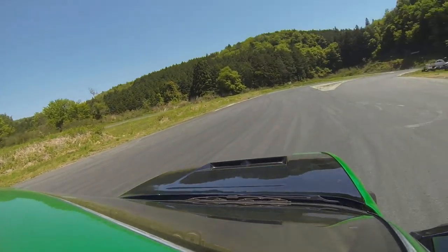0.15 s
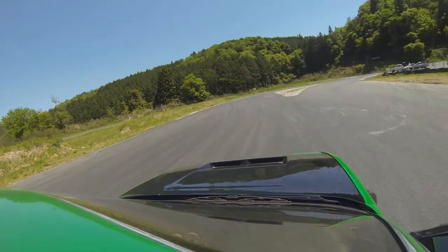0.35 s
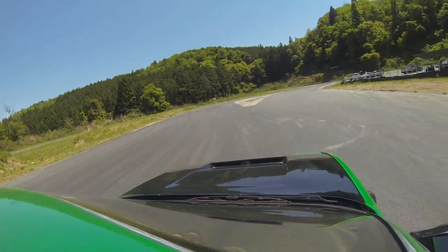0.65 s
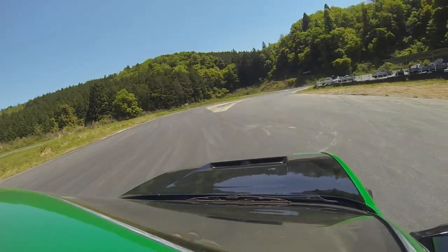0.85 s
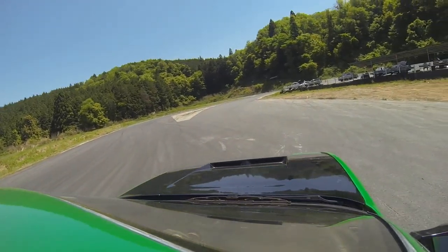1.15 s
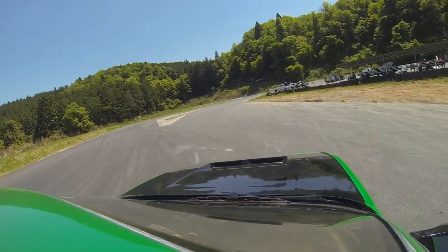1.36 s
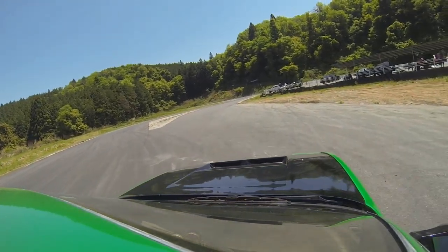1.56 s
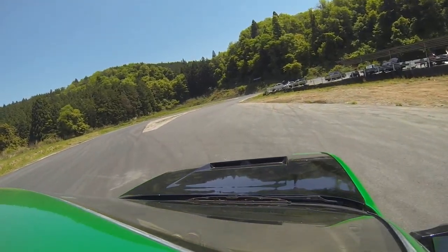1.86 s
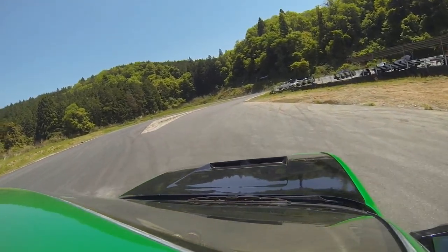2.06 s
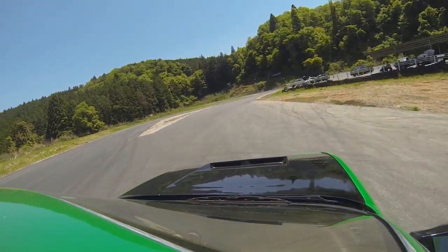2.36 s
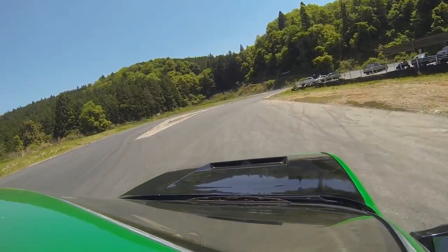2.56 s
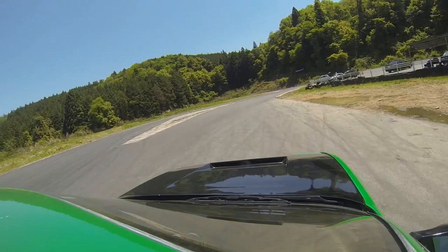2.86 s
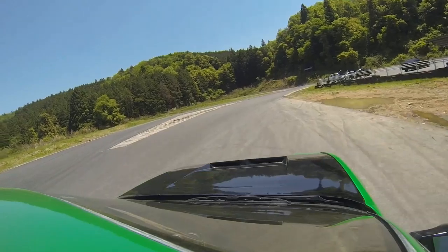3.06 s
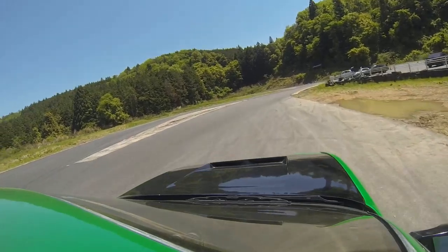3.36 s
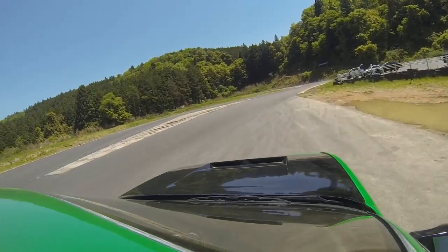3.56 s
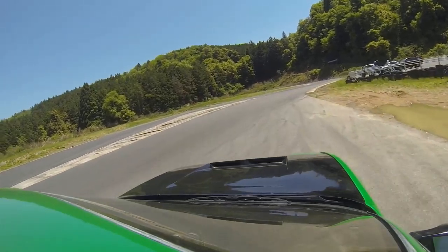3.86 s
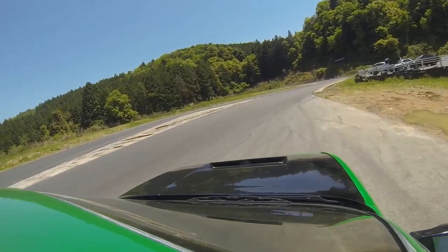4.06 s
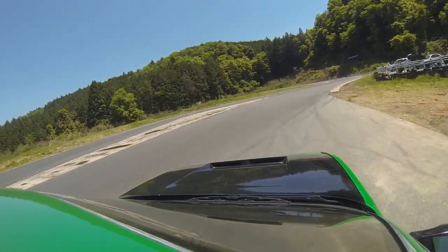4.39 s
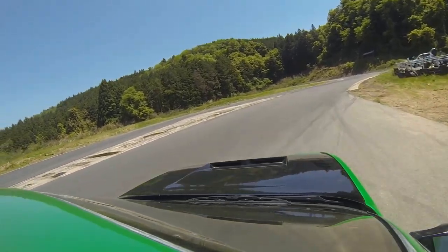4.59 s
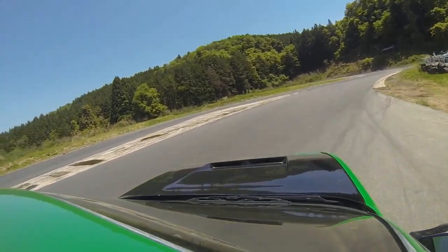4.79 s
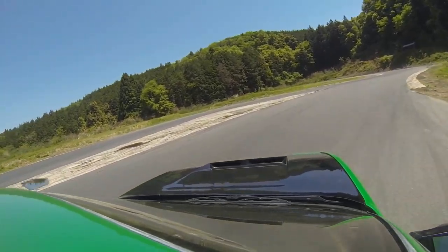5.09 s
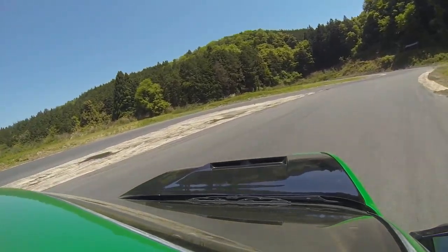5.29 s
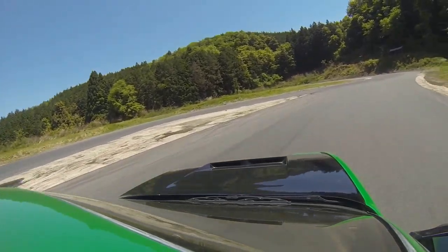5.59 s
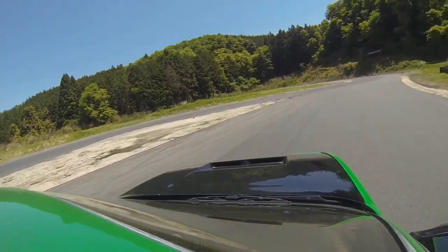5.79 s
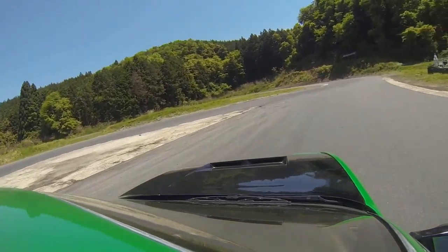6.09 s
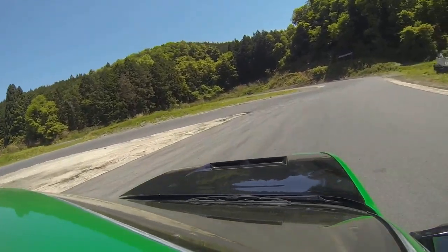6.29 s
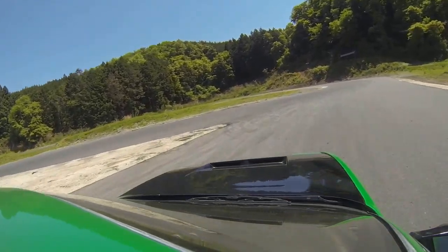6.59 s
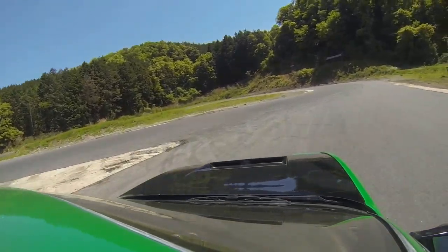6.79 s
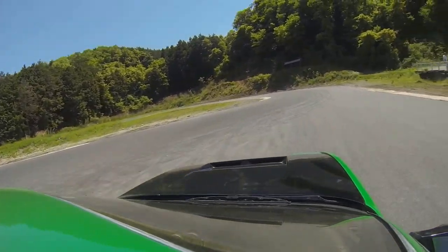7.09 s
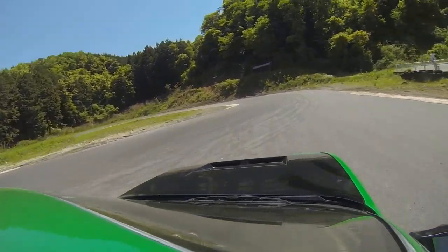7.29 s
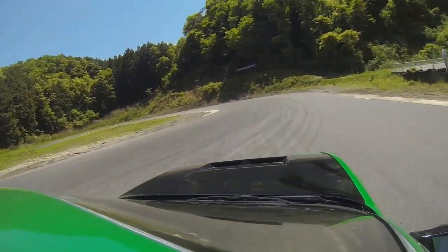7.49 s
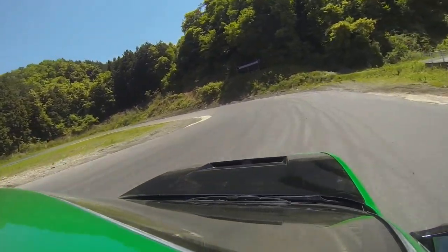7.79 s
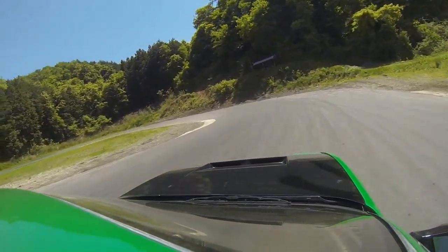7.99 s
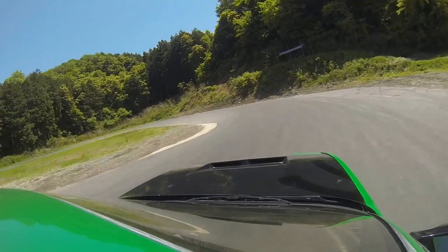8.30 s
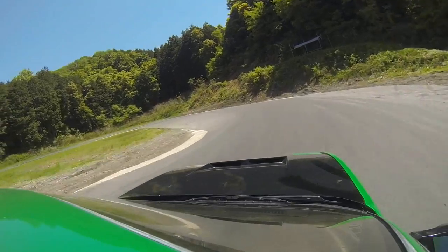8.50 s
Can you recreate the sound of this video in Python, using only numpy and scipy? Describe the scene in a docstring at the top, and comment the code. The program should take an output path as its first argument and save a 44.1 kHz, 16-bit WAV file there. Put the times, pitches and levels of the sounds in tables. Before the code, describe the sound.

Close, boxy, bass-heavy onboard sound on an open track. Scraping rubber and separate low exhaust thumps open it, then a droning exhaust with mount rattle smooths out as it rises. Breathy whistles lead to a rapid air flutter at the lift. Revs sink, hiccup, and climb again for over three seconds; near the end the engine breaks briefly, tyres bark and rasp, and revs stay high.

```python
"""On a track, from a muffled microphone in a housing on the body of a turbocharged car that pulls away and slides.
Closest is the exhaust: firing pulses, summed as engine orders, boom through the pipe after single stumbling firings.
Ticks of filtered noise shake out of the mount; engine and road noise, in bands, roars through the housing's
resonances, swelled in flutters by the turbo's puffs on lift-off. Wavering tones and ragged noise make the tyres
chirp and scrape; gliding noise bands whistle and thin gliding tones squeak."""
import sys
import numpy as np
from scipy import signal
from scipy.fft import rfft, irfft, next_fast_len
from scipy.io import wavfile
from scipy.ndimage import uniform_filter1d

SR = 44100
rng = np.random.default_rng(int(sys.argv[2]) if len(sys.argv) > 2 else 0)


def boost(x):
    """Linear amplitude factor 10**(x/20) for a level x in decibels (scalar or array-like)."""
    u = np.asarray(x, float) / 20
    return 10 ** u


def dump_mix(stems):
    """Bounce the given channels to the path in sys.argv[1] as a 16-bit WAV at rate SR."""
    frames = np.atleast_2d(stems).T  # one column per channel
    limited = np.clip(frames, -1, 1)  # hard clip at full scale
    pcm = np.round(limited * 32767).astype(np.int16)
    wavfile.write(sys.argv[1], SR, pcm)


N = 381465
T = np.arange(N) / SR

# exhaust level before the spread of single firings; steady running starts at the first row: (time [s], level [dB])
ENGINE_LEVEL = [(.66, -15.5), (.93, -16.5), (1.04, -14), (1.6, -14.5), (1.95, -12.5), (3.15, -11),
                (3.45, -13), (3.9, -15.5), (4.2, -16), (4.4, -14.5), (5.5, -13.5), (7.25, -9.5), (7.7, -12),
                (7.92, -13.5), (8.17, -14.5), (8.33, -12), (8.47, -13.5), (8.65, -10.5)]
TICK_AT = .04  # [cycles] place of the mount's tick in the firing cycle


def rms_one(x):
    """Scale to unit rms."""
    return x / np.sqrt(np.mean(x ** 2) + 1e-20)


def in_time(rows):
    """Columns of a curve at every sample."""
    seconds, *columns = np.transpose(rows)
    return [np.interp(T, seconds, column) for column in columns]


def at_hz(points, hz):
    """A spectrum read on a log-frequency axis."""
    point_hz, point_db = np.transpose(points)
    return np.interp(np.log(hz + 1), np.log(point_hz), point_db)


def hump(middle_s, half_s):
    """A rounded swell from 0 to 1 and back."""
    return np.clip(1 - ((T - middle_s) / half_s) ** 2, 0, 1)


def drift(rate_hz):
    """Slow chance with a spread of about 1: noise through two equal poles at rate_hz."""
    pole = np.exp(-80 * np.pi * rate_hz / SR)  # run at every 40th sample
    noise = rng.standard_normal(N // 40 + 2002)
    slow = signal.lfilter([1], [1, -2 * pole, pole * pole], noise)[2000:]
    return np.interp(np.arange(N) / 40, np.arange(len(slow)), rms_one(slow))


def housed(x, low_hz, high_hz, ringing=1):
    """One band of a sound through the housing: a plain and a resonant version, each of rms 1, blended by a share 0-1."""
    # what the housing lets through: (frequency [Hz], relative level [dB])
    housing_response = [(15, -16.5), (40, -6.5), (90, 2.5), (200, 0.5), (300, -10), (600, -10.5),
                        (1300, -14), (2400, -23.5), (3400, -28), (4500, -33.5), (5600, -40.5),
                        (6500, -49.5), (7500, -53), (9500, -60.5), (13000, -66.5), (15500, -77.5)]
    # housing resonances and notches: (frequency [Hz], width [Hz], gain [dB])
    resonances = [(433, 40, 4), (1035, 130, 7), (1547, 110, 5), (2020, 280, 4.5), (2350, 110, 6),
                  (2710, 70, 4), (3180, 120, 2.5), (3380, 220, -5), (3668, 75, 9), (3930, 100, -3),
                  (4030, 70, 5), (4245, 140, 9.5), (4700, 70, 4.5), (5100, 160, 7), (5350, 200, -2),
                  (5680, 200, 4), (6050, 400, -3), (8650, 1100, 10.5)]
    size = next_fast_len(N)
    hz = np.arange(size // 2 + 1) * SR / size
    rings_db = sum(db / (1 + (2 * (hz - f) / width) ** 2) for f, width, db in resonances)
    band = 1 / np.sqrt((1 + (low_hz / (hz + 1)) ** 12) * (1 + (hz / high_hz) ** 12))
    plain = rfft(x, size) * boost(at_hz(housing_response, hz)) * band
    rung = plain * boost(rings_db)
    rung, plain = (rms_one(irfft(spectrum, size)[:N]) for spectrum in (rung, plain))
    return ringing * rung + (1 - ringing) * plain


def roar(cycles, throttle):
    """Engine, wind and road noise in the housing; upper bands throb with the firings and swell with the turbo's puffs."""
    # wind buffeting and road rumble: (time [s], buffeting [dB], rumble [dB])
    rumble_curve = [(0, -41, -33.5), (.4, -35, -31), (.7, -31, -28.5), (1.3, -31, -29), (1.8, -38, -28),
                    (2.2, -49.5, -34.5), (3, -41, -28.5), (3.7, -34, -25.5), (4.4, -43, -29.5),
                    (5.2, -33.5, -26.5), (6, -43.5, -27), (7, -43.5, -23), (7.7, -36.5, -26),
                    (8.65, -38, -28.5)]
    # middle of the roar: (time [s], level [dB])
    roar_curve = [(.03, -38), (.31, -34.5), (.5, -39), (.88, -45), (1.15, -43.5), (1.85, -37),
                  (2.06, -33.5), (2.37, -29), (2.63, -29), (3, -25), (3.055, -28), (3.11, -28), (3.25, -26),
                  (3.7, -26.5), (4.04, -31), (4.35, -35), (4.66, -31), (5.3, -28.5), (6.9, -27.5),
                  (7.48, -26), (7.72, -25.5), (7.9, -23), (8.22, -25), (8.65, -24)]
    # the treble: (time [s], hiss [dB], fizz [dB])
    treble_curve = [(.03, -65, -88), (.2, -62, -87), (.36, -56, -73), (.55, -54.5, -69), (.88, -82.5, -87),
                    (1.2, -75, -83), (1.8, -61, -79.5), (2.1, -51.5, -82), (2.6, -46, -66),
                    (3, -42.5, -69.5), (3.5, -47, -56), (3.75, -42.5, -60), (4.1, -56.5, -70.5),
                    (4.35, -54.5, -70), (4.66, -51.5, -69.5), (5.2, -45.5, -69.5), (5.85, -40.5, -62.5),
                    (6.8, -38, -56), (7.48, -43, -56.5), (7.83, -40, -52.5), (7.87, -37, -51.5),
                    (8.19, -43, -49.5), (8.23, -54, -56), (8.6, -39, -51)]
    # the topmost sizzle: (time [s], level [dB])
    sizzle_curve = [(.03, -100), (.93, -86.5), (1.9, -93.5), (2.3, -100), (2.7, -91), (3.5, -84.5),
                    (4.1, -91.5), (6.1, -97), (7.1, -69), (7.83, -63.5), (7.87, -58.5), (8.2, -66.5),
                    (8.6, -72.5)]
    # turbo air puffing back after lift-off, to be weighted in each band:
    # (time [s], rise [s], hold [s], swell [dB])
    puffs = [(3.116, 0.023, .04, 3), (3.26, .004, .03, 14.5), (3.295, .015, .012, 5.5),
             (3.328, .012, .013, 10), (3.415, 0.022, 0.032, 6), (3.495, 0.014, .02, 7.5),
             (3.657, 0.021, 0.031, 3), (3.717, .015, 0.013, 5), (7.855, .005, 0.023, 6.5),
             (7.911, .01, 0.016, 4.5)]
    puff_decay_s = .014
    ringing_shut, ringing_wander = .1, .15  # shares 0-1
    always_ringing_from_hz = 5000

    roar_db, = in_time(roar_curve)
    rasp_db = roar_db - 7.5
    buffet_db, rumble_db = in_time(rumble_curve)
    hiss_db, fizz_db = in_time(treble_curve)
    sizzle_db, = in_time(sizzle_curve)
    puff_db = 0
    for s, rise, hold, db in puffs:
        falling_s = np.maximum(T - s - rise - hold, 0)
        puff_db = puff_db + db * np.clip((T - s) / rise, 0, 1) * np.exp(-falling_s / puff_decay_s)
    gust = .15 * drift(5.3) + .5 * drift(36)
    throb = np.cos(2 * np.pi * (cycles - TICK_AT))
    # (low edge [Hz], high edge [Hz], level [dB])
    layers = [
        (10, 62, buffet_db + drift(6)),
        (55.5, 336, rumble_db + drift(14)),
        (265, 1340, roar_db + .52 * puff_db + 1.7 * gust + .99 * throb + .92 * drift(37)),
        (1560, 3600, rasp_db + .56 * puff_db + 1.1 * gust + .86 * throb + .86 * drift(25)),
        (2960, 6400, hiss_db + .59 * puff_db + 1.9 * gust + .5 * throb + drift(11)),
        (5930, 14000, fizz_db + .9 * puff_db + 2.1 * gust + 1.2 * throb + 1.3 * drift(13)),
        (9900, 15500, sizzle_db + 1.1 * puff_db + 1.8 * gust + 1.2 * drift(10))]
    # below the fizz, the resonances blur off throttle and wander band by band
    blur = (1 - ringing_shut) * (1 - throttle)
    out = 0
    for low_hz, high_hz, db in layers:
        noise = rng.standard_normal(N)
        least = low_hz > always_ringing_from_hz
        ringing = np.clip(1 - blur - ringing_wander * np.abs(drift(1.9)), least, 1)
        out = out + boost(db) * housed(noise, low_hz, high_hz, ringing)
    return out


def whistles():
    """Breathy hums and whistles: narrow bands of noise that glide in pitch, swell and fade."""
    # (middle [s], half length [s], start [Hz], end [Hz], rate of the noise's drift [Hz], level [dB])
    whistle_rows = [(0.17, 0.15, 100, 84, 23, -29), (1.684, 0.36, 427, 435, 24, -39.5),
                    (2.891, .25, 3650, 3680, 48, -46.5), (2.918, 0.2, 4330, 4240, 53, -48.5),
                    (3.123, .22, 1478, 1560, 19, -35), (3.24, .11, 1817, 2090, 20, -34.5),
                    (0.363, 0.045, 1757, 1850, 120, -33.5), (3.607, 0.25, 448, 423, 20, -31),
                    (.16, 0.079, 2340, 2300, 30, -47), (7.968, .06, 988, 1060, 110, -36.5),
                    (8.13, .03, 1017, 990, 43, -27)]
    out = 0
    for s, half, start_hz, end_hz, width_hz, db in whistle_rows:
        hz = np.interp(T, [s - half, s + half], [start_hz, end_hz])
        phase = 2 * np.pi * np.cumsum(hz) / SR
        band = drift(width_hz) * np.cos(phase) + drift(width_hz) * np.sin(phase)
        out = out + boost(db) * hump(s, half) * band
    return out


def squeaks():
    """Thin high tones that glide fast, then more slowly, with a wavering pitch and a ragged level."""
    # (start [s], end [s], start pitch [Hz], end pitch [Hz], level before raggedness [dB])
    squeak_rows = [(0, .045, 5000, 4400, -60), (.06, .125, 5400, 3950, -56), (.16, .19, 4350, 4300, -58),
                   (.225, 0.272, 5600, 3950, -54), (.25, .288, 3600, 3800, -50),
                   (.28, .325, 3850, 3550, -48), (.46, 0.521, 2520, 2250, -43),
                   (.512, 0.61, 5250, 3650, -53)]
    out = np.zeros(N)
    waver = 1 + .02 * drift(60) + .02 * drift(250)
    for start, end, start_hz, end_hz, db in squeak_rows:
        part = np.clip((T - start) / (end - start), 0, 1)
        hz = waver * (start_hz + (end_hz - start_hz) * part ** .6)
        ragged_db = 3 * np.minimum(drift(70), 1)
        swell = np.sqrt(np.abs(np.sin(np.pi * part))) * (part < 1)
        out += boost(db + ragged_db) * swell * np.sin(2 * np.pi * np.cumsum(hz) / SR)
    return out


def tyres():
    """Stick-slip of the rubber: wavering tones with a ragged level, over a scrubbing noise."""
    # scrapes without a tone: (middle [s], half length [s], level before raggedness [dB])
    scrape_rows = [(0.243, 0.017, -40), (0.357, 0.039, -28), (0.328, 0.43, -35), (3.144, 0.27, -30),
                   (3.808, 0.049, -34), (7.8, 0.075, -25.5), (7.87, 0.051, -27.5), (7.974, 0.026, -25)]
    # rasping higher scrapes of the last slide: (middle [s], half length [s], level before raggedness [dB])
    high_scrape_rows = [(7.78, .04, -36), (7.874, .05, -29.5), (7.961, .05, -34.5), (8.045, .04, -41.5),
                        (8.15, 0.11, -35.5)]
    # one list a squeal: (time [s], pitch [Hz], level before raggedness [dB], overtones [dB])
    squeal_curves = [
        [(0, 565.4, -34.5, 0.5), (.1, 570, -43, -8), (.17, 571, -35, -6.5), (.21, 569, -51, 17.5),
         (.26, 539, -38, 4), (.3, 566, -47, 8), (.39, 573, -34.5, -15), (.46, 564, -56, -1),
         (.51, 576, -44, 5.5), (.55, 560, -59, -2)],
        [(7.75, 1172, -28, -12), (7.76, 1167, -21.5, -9), (7.776, 1145, -16, -29), (7.788, 1023, -16, -8.5),
         (7.802, 1030, -17.5, -13), (7.812, 997, -15.5, -9), (7.825, 976, -38, -8)],
        [(7.86, 976, -37, -13), (7.868, 934, -16, -17), (7.878, 953, -15.5, -29), (7.888, 970, -24, -1.5),
         (7.903, 930, -22, -9.5), (7.915, 950, -45, -7)],
        [(8.03, 715, -42, -12), (8.042, 710, -24.5, -6), (8.058, 700, -21, -12), (8.07, 696, -32, -5)],
    ]
    # one list a squeal: (multiple of the pitch, level added to the overtones' [dB])
    squeal_overtones = [
        [(2, -1), (4.15, -12.5)],
        [(1.5, -1.1), (2, -0.47)],
        [(2.15, -0.11), (2.5, -1)],
        [(1.4, 0)],
    ]
    bite_db = -15  # noise of a squeal against its tone

    out = np.zeros(N)
    scrub = housed(rng.standard_normal(N), 620, 2500)
    bite = housed(rng.standard_normal(N), 1400, 3700)  # the squeals bite higher
    rasp = housed(rng.standard_normal(N), 2200, 3700, ringing=0)
    for noise, rows in [(scrub, scrape_rows), (rasp, high_scrape_rows)]:
        ragged_db = 2 * drift(45)
        out += noise * boost(ragged_db) * sum(boost(db) * hump(s, half) for s, half, db in rows)
    for rows, overtones in zip(squeal_curves, squeal_overtones):
        hz, db, overtones_db = in_time(rows)
        on = uniform_filter1d(1. * (T >= rows[0][0]) * (T < rows[-1][0]), size=200)
        turns = np.cumsum(hz * (1 + .008 * drift(30))) / SR
        out += on * boost(db + bite_db) * bite
        partials = [(1, .0092)] + [(multiple, level_db + overtones_db) for multiple, level_db in overtones]
        for multiple, partial_db in partials:
            ragged_db = 2.4 * drift(80)
            tone = np.sqrt(2) * np.sin(2 * np.pi * multiple * turns)
            out += on * boost(db + partial_db + ragged_db) * tone
    return out


def ticks(cycles, firing_hz, level_db):
    """The firings shake dry bursts of noise out of the mount, some harder, often after a fainter early one."""
    # lone hard ticks of the mount: (time [s], level before the filters [dB])
    lone_ticks = [(.642, -20), (.671, -15), (1.698, -20), (1.773, -15), (1.801, -14), (1.816, -17),
                  (1.931, -15), (1.985, -16), (2.01, -19)]
    # ticks fade with the square of the engine speed above 50 firings a second, and with a quieter exhaust
    tick_db = np.maximum(-14.5 - .05 * np.maximum(firing_hz - 50, 0) ** 2, -41)
    tick_db = tick_db + 2.5 * np.minimum(level_db + 15, 0)
    clicks = np.zeros(N)
    # (lead [cycles], level [dB], mean random loss [dB])
    for lead, db, spread_db in [(0, 0, 2), (.24, -8, 7)]:
        at = np.flatnonzero(np.diff(np.floor(cycles - TICK_AT + lead)) > 0)
        loss_db = spread_db * rng.exponential(1, 2000)[:len(at)]
        clicks[at] = boost(tick_db[at] + db - loss_db) * (T[at] > ENGINE_LEVEL[0][0])
    for s, db in lone_ticks:
        clicks[int(s * SR)] = boost(db)
    swell = np.exp(-T[:300] / .0007) * np.minimum(T[:300] / .0003, 1)  # [s] decay and rise
    burst = signal.fftconvolve(clicks, swell)[:N] * rng.standard_normal(N)
    burst = signal.sosfilt(signal.butter(1, [700, 2600], "band", fs=SR, output="sos"), burst)
    burst = signal.sosfilt(signal.butter(1, 2800, fs=SR, output="sos"), burst)
    return signal.sosfilt(signal.butter(6, 8300, fs=SR, output="sos"), burst)


def stumbles():
    """Single firings ring the pipe for a few cycles where the engine does not run evenly."""
    # (time [s], starting level before the filter [dB], ringing [Hz])
    stumble_rows = [(0.33, -20, 85), (0.352, -6, 90), (0.385, -14, 86), (0.433, -7, 110), (0.453, -16, 88),
                    (0.481, -5.5, 105), (0.507, -22, 80), (0.523, -7, 105), (0.555, -8.5, 125),
                    (0.589, -6, 140), (0.613, -2, 130), (0.645, -7, 150), (4.027, -3, 145), (7.748, 0, 175)]
    cycles_to_fade = 7.2  # for a fall of 60 dB
    out = np.zeros(N)
    for s, db, hz in stumble_rows:
        age = np.maximum(T - s, 0)
        out += boost(db - 60 * age * hz / cycles_to_fade) * np.sin(2 * np.pi * hz * age)
    return signal.sosfilt(signal.butter(2, [45, 260], "band", fs=SR, output="sos"), out)


def exhaust(cycles, firing_hz, level_db, overtones_db):
    """The firing pulses as orders, coloured and phase-turned by the pipe; half orders from unequal cylinders."""
    # colour of the exhaust pipe: (frequency [Hz], relative level [dB])
    pipe_response = [(20, -51.5), (43, -40.5), (57, -25.5), (75, -10), (110, 1), (135, 4), (190, 3.5),
                     (212, -5.5), (235, -10), (262, -10), (282, -1.5), (318, -12), (370, -21), (410, -8),
                     (440, -5.5), (475, -27), (600, -24), (800, -18), (1000, -16), (1500, -48.5)]
    # weak or missed firings: (time [s], length [s], gain before smoothing [dB])
    misses = [(1.657, .08, -3.5), (3.429, 0.018, -4.5), (3.945, 0.036, -3), (4.019, 0.076, -3.5),
              (4.137, 0.037, -34), (5.345, 0.034, -2), (7.746, 0.028, -12), (7.763, 0.026, -29),
              (7.78, 0.06, -3.5), (8.194, 0.011, -16), (8.246, 0.036, -9)]
    pulse_at = .11  # [cycles]
    pulse_db_per_octave, high_orders_db_per_octave, half_orders_db = -6, -3.5, -21
    high_rev_hz, high_rev_db_per_hz = 124, .9  # the pulses sharpen above this firing rate

    out, power = 0, 0
    for order in [.5, 1, 1.5, 2, 2.5, 3, 3.5, 4, 5, 6, 7, 8, 9, 10]:
        hz = order * firing_hz
        order_db = at_hz(pipe_response, hz)
        order_db = order_db + (pulse_db_per_octave + overtones_db) * np.log2(order)
        order_db = order_db + high_orders_db_per_octave * np.log2(max(order, 3) / 3)
        if order % 1:
            order_db = order_db + half_orders_db
        order_db = order_db + .25 * order * drift(4)  # higher orders come and go
        if order > 2:  # these sink deeper into the pipe's notch
            order_db = order_db - 12 / (1 + ((hz - 247) / 17) ** 2)
        if order == 4:  # fades above the notch
            order_db = order_db - 7 * (1 + np.tanh((hz - 300) / 10)) / 2
        if order > 3:
            order_db = order_db + high_rev_db_per_hz * np.maximum(firing_hz - high_rev_hz, 0)
        gain = boost(order_db)
        # each pulse swings up, then sharply down; the phase turns over through the notch near 250 Hz
        lead = 3.4 + np.arctan((hz - 250) / 14)
        out = out + gain * np.cos(2 * np.pi * order * (cycles - pulse_at) + lead)
        power = power + gain ** 2 / 2
    missed_db = sum(db * ((T > s) & (T < s + length)) for s, length, db in misses)
    running = uniform_filter1d(boost(missed_db) * (T > ENGINE_LEVEL[0][0]), size=300)
    return out / np.sqrt(power) * boost(level_db) * running


def scene():
    """All sources at the one microphone, the firings shared by exhaust, ticks and roar."""
    # engine speed: (time [s], firings per second [Hz])
    speed_curve = [(.66, 44.7), (.73, 46.15), (.82, 42.75), (.9, 38), (.95, 39.1), (1.05, 45.6),
                   (1.2, 48.4), (1.33, 51.6), (1.45, 59.1), (1.59, 63.5), (2.17, 89.7), (2.66, 110.1),
                   (2.93, 120.3), (3.24, 129.8), (3.33, 124.9), (4, 79.2), (4.06, 73), (4.11, 74),
                   (4.14, 80), (4.23, 83), (4.35, 78.5), (4.73, 86.5), (5.09, 89.7), (5.35, 94.1),
                   (5.87, 106), (6.49, 116), (7.18, 135), (7.62, 144), (7.74, 143), (7.8, 124), (7.85, 125),
                   (7.92, 132), (8.12, 131.5), (8.19, 134), (8.26, 137), (8.33, 146), (8.39, 143),
                   (8.47, 137.4), (8.65, 141.1)]
    # throttle: (time [s], opening [0-1])
    throttle_curve = [(.95, .65), (1.5, 1), (3.2, 1), (3.4, .45), (3.8, 0), (4.01, .05), (4.06, 1),
                      (7.45, 1), (7.7, .3), (8.2, .3), (8.4, .55), (8.65, .55)]
    # spells of rough running: (middle [s], half length [s], added spread of firing strength [dB])
    rough_spells = [(1.67, .2, 1), (3.45, .3, 1), (4.12, .15, 1), (8, .45, .8)]
    firing_hz, = in_time(speed_curve)
    level_db, = in_time(ENGINE_LEVEL)
    throttle, = in_time(throttle_curve)
    spread_db = .7 + sum(db * hump(s, half) for s, half, db in rough_spells)
    cycles = np.cumsum(firing_hz) / SR
    # each firing has its own strength and timing
    chance = rng.standard_normal((2000, 2))
    strength, shift = (np.interp(cycles, np.arange(2000), column) for column in chance.T)
    cycles = cycles + .012 * spread_db * shift  # .012 cycles per dB of spread
    overtones_db = -9 * (1 - throttle)  # [dB per octave] duller off throttle
    engine = exhaust(cycles, firing_hz, level_db + spread_db * strength, overtones_db) + stumbles()
    around = ticks(cycles, firing_hz, level_db) + roar(cycles, throttle)
    return (engine + around + tyres() + squeaks() + whistles())[None]


def band_limit(x):
    """A steep low-pass at the top of the band."""
    return signal.sosfilt(signal.butter(12, 15800, fs=SR, output="sos"), x)


def record(dry):
    """The microphone's signal with its peaks softly rounded."""
    rounded = 1.171 * np.tanh(dry / 1.208)
    return band_limit(rounded)


dry = scene()
out = record(dry)
dump_mix(out)
```